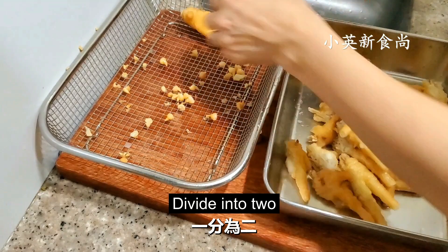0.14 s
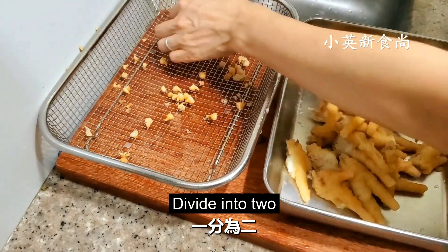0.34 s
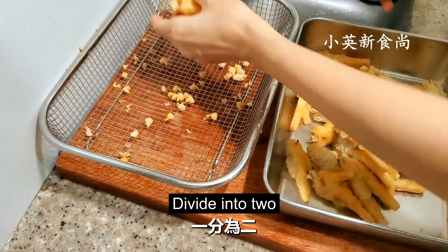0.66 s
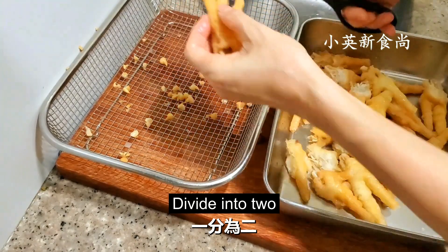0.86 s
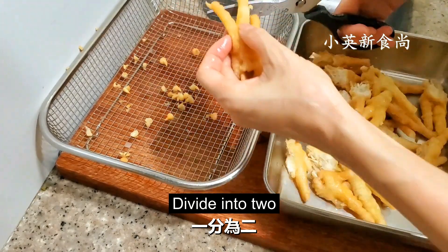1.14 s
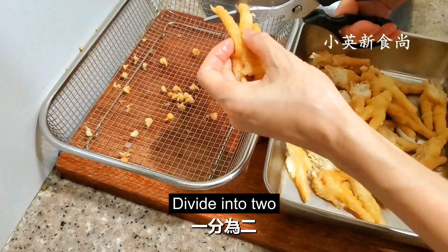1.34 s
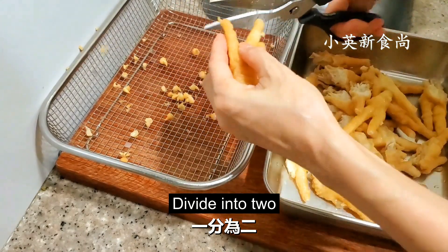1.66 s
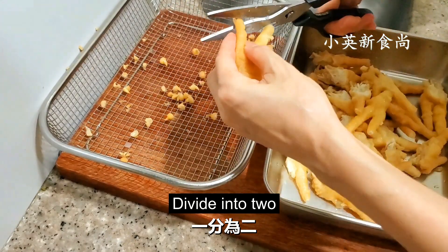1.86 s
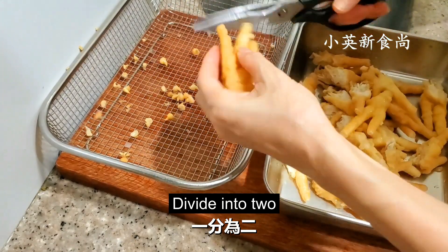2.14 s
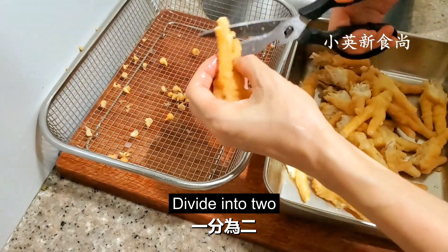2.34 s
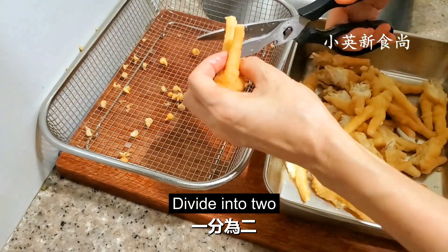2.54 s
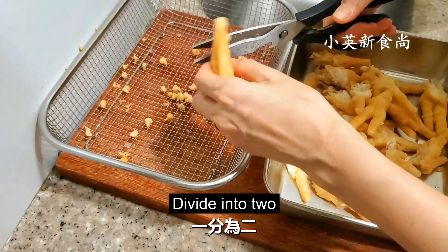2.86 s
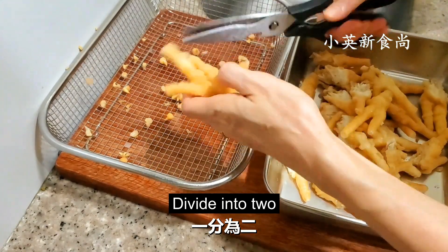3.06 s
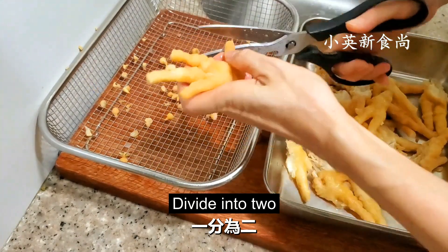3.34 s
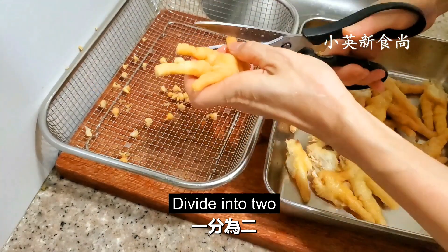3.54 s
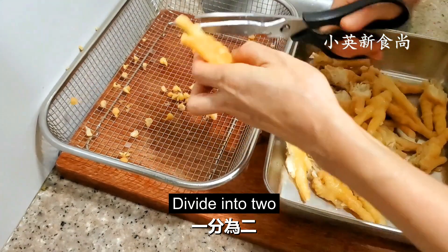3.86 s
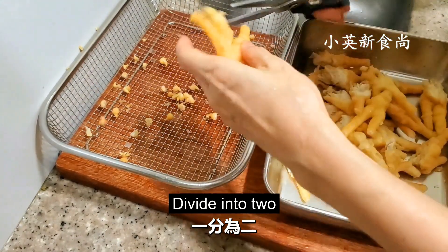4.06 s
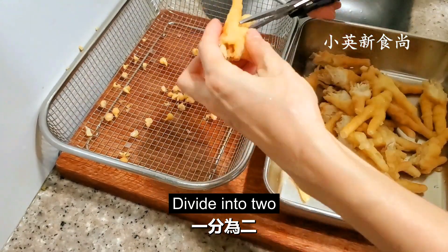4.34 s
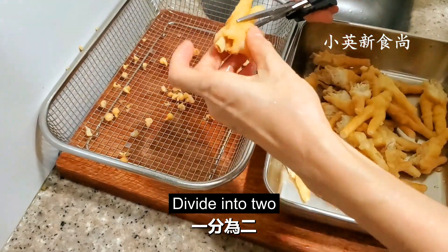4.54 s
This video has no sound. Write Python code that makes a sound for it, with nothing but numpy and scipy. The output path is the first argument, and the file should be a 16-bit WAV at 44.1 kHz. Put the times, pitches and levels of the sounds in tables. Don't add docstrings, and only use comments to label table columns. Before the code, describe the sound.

Soft fingers and sleeve rub while a low, slightly wavering fan hum sits behind. The loudest event is early: flesh landing on wire mesh with a bright metallic rattle and bouncing bits. After faint taps and a light tray nudge, scissors cut crisply twice, then crunch through gristle in quick sharp cracks with pinging wires. Close, dry-ish stereo with a short tiled-room tail.

```python
import sys
import numpy as np
from scipy import signal
from scipy.fft import rfft, irfft
from scipy.io import wavfile
from scipy.ndimage import uniform_filter1d

SR = 44100
rng = np.random.default_rng(int(sys.argv[2]) if len(sys.argv) > 2 else 0)


def attenuation_scalar(level_db):
    decades = np.asarray(level_db, float) / 20
    return 10 ** decades


def generate_wav(signal):
    frames = np.transpose(np.atleast_2d(signal))
    scaled = np.clip(frames, -1, 1) * 32767
    pcm = np.round(scaled).astype(np.int16)
    wavfile.write(sys.argv[1], SR, pcm)


N = 207291


def band(x, lo_hz, hi_hz):
    return signal.sosfilt(signal.butter(2, [lo_hz, hi_hz], "band", fs=SR, output="sos"), x)


def unit(x):
    return x / np.sqrt(np.mean(x ** 2))


def curve(rows, column):
    rows = np.array(rows)
    return np.interp(np.arange(N) / SR, rows[:, 0], rows[:, column])


def over_hz(hz, rows):
    rows = np.array(rows, float)
    return np.interp(np.log(hz + 1), np.log(rows[:, 0] + 1), rows[:, 1])


def walk(rate):
    hold = int(SR / rate)
    steps = np.repeat(rng.standard_normal(N // hold + 1), hold)
    return unit(uniform_filter1d(uniform_filter1d(steps, hold), hold)[:N])


def resonance(hz, centre_hz, width_hz):
    return 1 / (1 + 2j * (hz - centre_hz) / width_hz)


def decay(t, t60_s):
    return np.exp(-np.log(1000) * t / t60_s)


def ports(count, alike, lag=0):
    common = rng.standard_normal(count)
    own = rng.standard_normal((2, count))
    shared = np.array([np.roll(common, lag), common])
    return np.sqrt(alike) * shared + np.sqrt(1 - alike) * own


def add(out, s, x):
    i = int(s * SR)
    out[:, i:i + x.shape[1]] += x[:, :N - i]


# (f/Hz, level/dB per Hz)
AIR = [(12, -67), (20, -32.5), (64, -7), (80, 0.5), (146, -15), (206, -14.5), (229, -23), (360, -25.5),
       (394, -28), (481, -26.5), (690, -33.5), (857, -39.5), (1500, -38), (1950, -69.5), (3300, -120)]
# (f/Hz, level/dB per Hz)
HISS = [(880, -33), (1500, 0), (2390, -12.5), (2820, -7.5), (4450, -18), (4810, -15.5), (9330, -23),
        (11100, -17.5), (15100, -15.5), (15900, -17.5)]
# (f/Hz, width/Hz, level/dB rms)
ROOM_MODES = [(79.56, 11, -44), (203.4, 20, -55), (395.5, 45, -60), (461, 21, -67), (695, 22, -76)]
# (t/s, level/dB)
HUM_SWELL = [(0.0, -34), (.3, -46), (.5, -33), (.66, -46), (.95, -34), (1.3, -32.5), (1.6, -48.5),
             (2.05, -40.5), (2.5, -44), (3.3, -41.5), (3.7, -45.5), (4.3, -41), (4.7, -44)]
# (f/Hz, likeness 0-1)
ALIKE = [(60, 0.98), (130, 1), (290, 0.81), (640, 0.4), (1410, 0), (3100, .05), (6300, 0.7), (7200, 0.1),
         (15000, .6)]
# (f/Hz, left minus right level/dB)
LEFT_DB = [(60, 1), (110, 1), (200, 2.5), (380, -0.5), (700, 4.5), (1290, -3.5), (2380, 8), (4400, 1),
           (8120, 7.5), (15000, 7.5)]


def extractor():
    hz = np.fft.rfftfreq(N, 1 / SR)
    alike = over_hz(hz, ALIKE)
    tilt = attenuation_scalar(over_hz(hz, LEFT_DB) * np.array([[.5], [-.5]]))

    def flow(gain):
        common = rfft(rng.standard_normal(N))
        own = rfft(rng.standard_normal((2, N)))
        return unit(irfft(tilt * (np.sqrt(alike) * common + np.sqrt(1 - alike) * own) * gain, N))

    air = attenuation_scalar(-40.5 + walk(2.4)) * flow(attenuation_scalar(over_hz(hz, AIR)))
    hiss = attenuation_scalar(-66.5) * flow(attenuation_scalar(over_hz(hz, HISS)))
    modes = [attenuation_scalar(db + 2.1 * walk(4.7)) * flow(resonance(hz, f, w) ** 2) for f, w, db in ROOM_MODES]
    swell = curve(HUM_SWELL, 1)
    return air + hiss + modes[0] * attenuation_scalar(swell - swell.mean()) + sum(modes[1:])


def kitchen(x):
    t = np.arange(SR // 2) / SR
    onset = 1 - np.exp(-(t / 0.0037) ** 2)
    tail = rng.standard_normal((2, len(t))) * decay(t, 0.22) * onset
    tail = tail / np.sqrt((tail ** 2).sum(axis=1, keepdims=True))
    return attenuation_scalar(-5) * signal.fftconvolve(x.mean(axis=0)[None], tail, axes=1)[:, :N]


# (t/s, length/s, level/dB, part on the wires/dB)
STROKES = [(0.206, 0.19, -47.5, -9), (0.351, 0.11, -44, 10.5), (0.421, 0.2, -60.5, 11.5),
           (0.942, 0.58, -57.5, 2), (1.332, .22, -55, -8), (1.444, 0.71, -66.5, 1.5), (2.44, 0.25, -59, -2),
           (3.026, 0.39, -56.5, -0.5), (3.89, 0.46, -54.5, -2), (0.562, 0.14, -60, 13),
           (2.655, 0.1, -70.5, 11.5), (4.634, 0.16, -57.5, 2.5)]
# (t/s, length/s, level/dB, change/dB)
SQUEAK = [
    (2.947, 0.107, -69.5, 4.5),
    (4.259, 0.33, -73.5, -6),
]


def hands():
    t = np.arange(N) / SR

    def rub(lo_hz, hi_hz, alike):
        grains = attenuation_scalar(1.5 * rng.exponential(size=N) + 1.2 * walk(30))
        return unit(band(grains * ports(N, alike), lo_hz, hi_hz))

    skin, on_wires = np.zeros(N), np.zeros(N)
    for s, length, db, wires_db in STROKES:
        swell = attenuation_scalar(db - 21.5 * np.abs(2 * (t - s) / length - 1) ** 1.6)
        skin += swell
        on_wires += attenuation_scalar(wires_db) * swell
    rest_bright_db, rest_dull_db = -76, -68
    friction = on_wires * rub(3500, 7440, 0.27)
    friction = friction + (attenuation_scalar(-1) * skin + attenuation_scalar(rest_bright_db)) * rub(8000, 16900, .7)
    friction = friction + (attenuation_scalar(-0.5) * skin + attenuation_scalar(rest_dull_db)) * rub(1100, 2580, 0.16)
    friction = friction + attenuation_scalar(2.5) * skin * rub(300, 900, .7)

    hz = np.fft.rfftfreq(N, 1 / SR)
    pivot = unit(irfft(rfft(ports(N, 0.23)) * resonance(hz, 2950, 300) ** 2, N))
    gate = np.zeros(N)
    for s, length, db, change_db in SQUEAK:
        edge = curve([(s - .03, 0), (s, 1), (s + length, 1), (s + length + .01, 0)], 1)
        gate += edge * attenuation_scalar(db + change_db * np.clip((t - s) / length, 0, 1))
    return attenuation_scalar(-5.5) * friction + attenuation_scalar(2.0) * gate * pivot


# (f/Hz, width/Hz, peak level/dB, ring/s)
BASKET = [(396, 45, -32.5, .06), (490.7, 210, -17.5, .05), (550, 120, -26, .045), (642, 88, -28.5, .05),
          (1564, 200, -34.5, .06), (2380, 350, -20, 0.16), (2720, 140, -27, 0.16), (3500, 730, -35, .2),
          (4460, 460, -31.5, .2)]
# (t/s, peak level/dB, f/Hz, ring/s)
KNOCKS = [(.378, -50.5, 1100, 0.51), (.381, -50, 630, 0.084), (3.233, -49.5, 1005, 0.31),
          (3.932, -42.5, 1100, 0.065), (4.010, -47.5, 613, 0.1), (4.155, -41.5, 680, 0.08)]
# (t/s, peak level/dB, f/Hz, ring/s)
RINGS = [(.231, -28.5, 2200, 0.029), (.379, -19, 6130, 0.069), (.378, -29, 4710, 0.12),
         (.379, -30.5, 3500, 0.14), (.379, -46.5, 2330, 0.18), (.451, -44, 6700, .05),
         (.607, -37, 5850, 0.1), (1.040, -48, 5880, 0.052), (1.516, -50, 6000, .062),
         (2.317, -45, 1790, 0.044), (2.448, -34.5, 1940, 0.077), (2.608, -43, 3240, 0.052),
         (3.064, -49, 1994, .093), (3.064, -45, 3250, 0.059), (3.144, -30, 6070, 0.04),
         (3.235, -43, 1750, 0.26), (3.233, -40, 4650, 0.16), (3.932, -34.5, 2163, 0.083),
         (3.964, -31.5, 2400, 0.076), (4.011, -35, 3500, .1), (4.008, -21, 5660, 0.041),
         (4.140, -22.5, 5060, 0.022), (4.140, -32.5, 2750, .093)]
# (t/s, peak level/dB, f/Hz, ring/s)
NUDGE = [
    (1.433, -44, 465, .4),
    (1.437, -51, 655, .15),
]


def rings():
    out, t = np.zeros((2, N)), np.arange(9216) / SR
    hz = np.fft.rfftfreq(len(t), 1 / SR)
    drop_s = .269
    rows = [(drop_s, db, f, w, ring) for f, w, db, ring in BASKET]
    for table, share in ((KNOCKS, 0.25), (RINGS, 0.22), (NUDGE, .055)):
        rows += [(s, db, f, f * share, ring) for s, db, f, ring in table]
    for s, peak_db, centre_hz, width_hz, ring_s in rows:
        push = (1 - np.exp(-t / .0016)) * decay(t, ring_s)
        lag = 4 if centre_hz < 900 else 10
        cluster = resonance(hz, centre_hz, width_hz) ** 2
        beating = unit(irfft(rfft(ports(len(t), 0.75, lag)) * cluster))
        struck = np.sin(2 * np.pi * centre_hz * (t - np.array([[lag], [0]]) / SR))
        add(out, s, attenuation_scalar(peak_db) * push * (.7 * beating + .35 * struck))
    return out


def strikes(rows, body, contact_ms, spread, crackle_db, snap_gain, alike, left_db, bright_ring, lag):
    out, t = np.zeros((2, N)), np.arange(9216) / SR
    hz = np.fft.rfftfreq(len(t), 1 / SR)
    colour = np.sqrt(1 + sum(np.abs(attenuation_scalar(db) * resonance(hz, f, w)) ** 2 for f, w, db in body))
    balance_db = np.array([[left_db], [-left_db]]) / 2
    for s, peak_db, dull_db, bright_db, ring_s, centre_hz in rows:
        contact = np.clip(contact_ms * attenuation_scalar(0.11 * (peak_db + 24.0)), .3, 20) / 1000
        fade = decay(np.maximum(t - contact, 0), np.clip(ring_s, .01, .4))
        slips = np.repeat(rng.uniform(-2, 1, len(t) // 32), 32) * (t > contact)
        snap = 1 + snap_gain * np.exp(-((t - contact) / .0012) ** 2)
        force = np.minimum(t / contact, 1) ** 0.84 * attenuation_scalar(crackle_db * slips) * snap
        patches = attenuation_scalar(2.4 * np.interp(hz, np.arange(45) * 500, rng.standard_normal(45)))

        def haze(likeness, delay):
            return irfft(rfft(ports(len(t), likeness, delay)) * colour * patches) * force

        dull = band(haze(alike, lag) * fade, 1500, 3200)
        middle = band(haze(alike, lag) * fade, centre_hz / spread, centre_hz * spread)
        bright = band(haze(.55, 0) * fade ** (1 / bright_ring), 9100, 15000)
        parts = ((dull_db, dull), (0, middle), (bright_db, bright))
        hit = sum(attenuation_scalar(db) * part / np.abs(part.mean(axis=0)).max() for db, part in parts)
        add(out, s - contact / 2, hit * attenuation_scalar(peak_db + balance_db))
    return out


# (f/Hz, width/Hz, level/dB over the haze)
MESH = [(2400, 1480, -18), (4578, 510, -2.5), (6295, 710, 10), (11100, 2100, 0), (13900, 1600, 7)]
# (t/s, peak level/dB, dull part/dB, bright part/dB)
TICKS = [(0.1348, -58, -21, -20), (0.382, -19.5, -12, -13), (0.453, -26.5, -23, -30),
         (0.4744, -31, -14.5, -24), (0.5027, -37.5, -14, -17), (0.5506, -32.5, -30, -32),
         (0.607, -29.5, -43, -10.5), (1.04, -57.5, -18, -12), (1.1753, -59, -10, 10),
         (1.3528, -41, -21, -14), (1.3648, -42.5, -11, -18), (1.5152, -49.5, -6, -7),
         (2.687, -54, -25, -29.5), (3.1432, -45.5, 1.5, -29), (3.2823, -40.5, -8, -26),
         (3.4538, -53, -10, -17), (3.9664, -23.5, -13.5, -24), (4.0087, -24, -12, -5.5),
         (4.0165, -21, -29, -22), (4.2076, -31.5, -18.5, -3)]
# (t/s, peak level/dB, dull part/dB, bright part/dB)
SLAPS = [
    (0.2693, -14, -2, 5),
    (0.2742, -14.5, -9.5, -3.5),
    (1.0146, -59, -14, 8),
    (1.4245, -43, -4.5, -1),
    (1.4385, -51, 3, -11),
    (2.5353, -53, 0, -13.5),
    (2.6104, -47.5, -27, -18),
    (2.728, -55.5, 8, -33),
    (3.2325, -33, -22, -6.5),
    (3.6776, -72.5, 1, 12),
]


def bounces():
    falls = []
    for table, centre_hz in ((TICKS, 6000), (SLAPS, 4200)):
        for s, db, dull_db, bright_db in table:
            ring_s = 0.095 * attenuation_scalar(-0.29 * (db + 33))
            falls.append((s, db, dull_db, bright_db, ring_s, centre_hz))
    return strikes(falls, MESH, contact_ms=3.7, spread=1.53, crackle_db=4, snap_gain=0.28,
                   alike=0.098, left_db=3.0, bright_ring=1.0, lag=12)


# (f/Hz, width/Hz, level/dB over the haze)
BLADES = [(1880, 260, 0.5), (3250, 240, 7.5), (10600, 500, -13), (14200, 900, -4.5)]
# (t/s, peak level/dB, dull part/dB, bright part/dB, centre f/Hz)
SNIPS = [
    (2.441, -53.5, 3.5, 16.5, 6400),
    (2.45, -35.5, -3.5, 12, 6900),
    (3.0657, -36.5, 4, 15, 7000),
    (3.917, -60.5, -10, 13, 3200),
    (3.932, -34, -8, 10, 7250),
    (4.117, -32.5, -20, -32, 4570),
    (4.14, -24, -15.5, -25, 4650),
    (4.6501, -56, -11, 25.5, 6300),
]


def snips():
    cuts = []
    for s, db, dull_db, bright_db, centre_hz in SNIPS:
        ring_s = .065 * attenuation_scalar(.33 * bright_db)
        cuts.append((s, db, dull_db, bright_db, ring_s, centre_hz))
    return strikes(cuts, BLADES, contact_ms=2.2, spread=1.8, crackle_db=6.5, snap_gain=0.78,
                   alike=0.74, left_db=3.5, bright_ring=0.66, lag=8)


def scene():
    steady = extractor() + hands()
    near = rings() + bounces() + snips()
    return near + kitchen(near) + steady


def narrow(x, from_hz, keep_db, luck_db, loud_db):
    mid, side = (x[0] + x[1]) / 2, (x[0] - x[1]) / 2
    hz, _, blocks = signal.stft(side, SR, nperseg=2048)
    for lo in np.arange(from_hz, SR / 2, 1300):
        rows = (hz >= lo) & (hz < lo + 1300)
        level = np.sqrt(np.sum(np.abs(blocks[rows]) ** 2, axis=0))
        luck = uniform_filter1d(rng.standard_normal(len(level)), 3)
        spared = (luck > 0) | (lo > 12000) | (level > attenuation_scalar(loud_db))
        blocks[rows] = blocks[rows] * ((level > attenuation_scalar(keep_db + luck_db * luck)) & spared)
    side = signal.istft(blocks, SR, nperseg=2048)[1][:N]
    return np.array([mid + side, mid - side])


def band_limit(x):
    return signal.sosfilt(signal.butter(12, 16830, fs=SR, output="sos"), x)


def record(dry):
    cut = signal.sosfiltfilt(signal.ellip(6, .3, 20, 15900, fs=SR, output="sos"), dry)
    mix = narrow(cut, from_hz=7000, keep_db=-84.5, luck_db=11.5, loud_db=-53)
    return band_limit(mix)


dry = scene()
out = record(dry)
generate_wav(out)
```